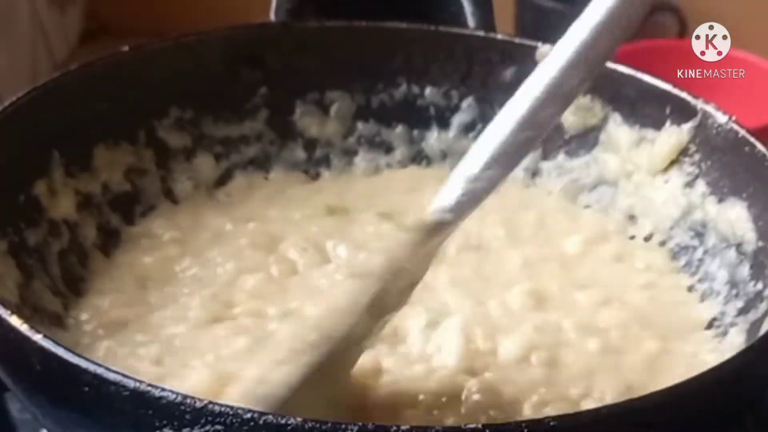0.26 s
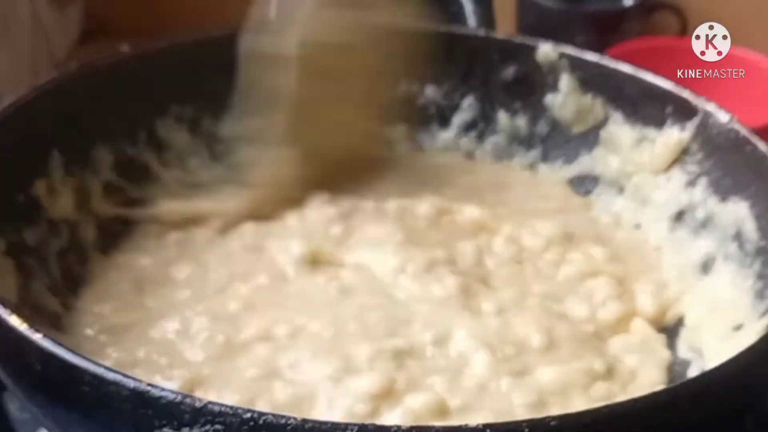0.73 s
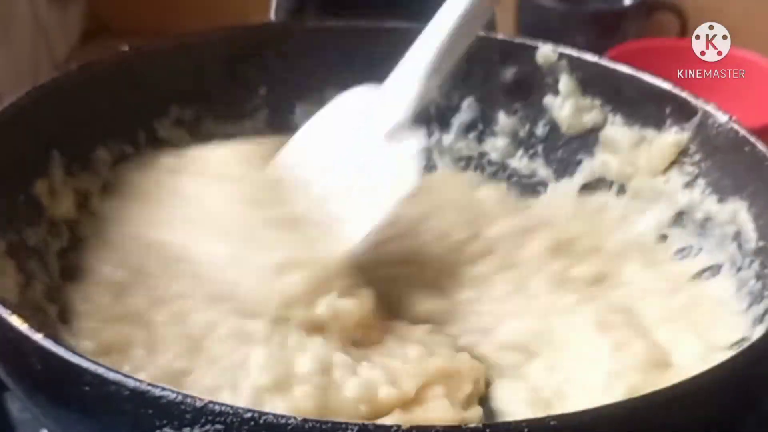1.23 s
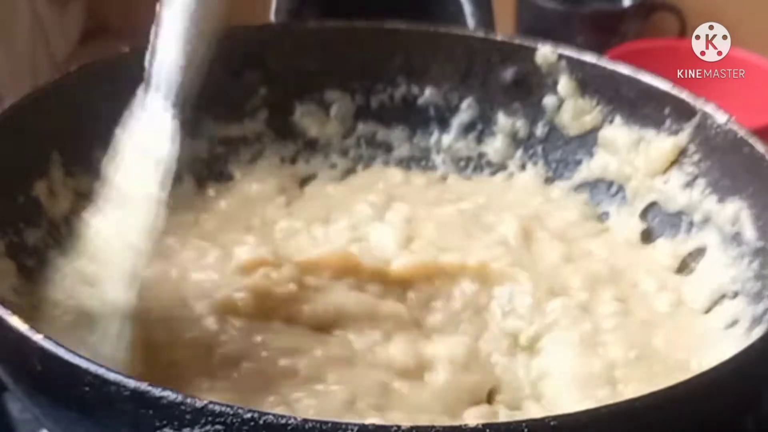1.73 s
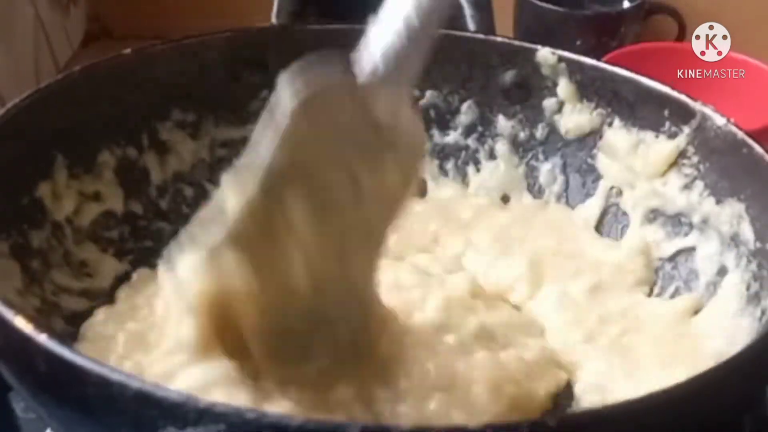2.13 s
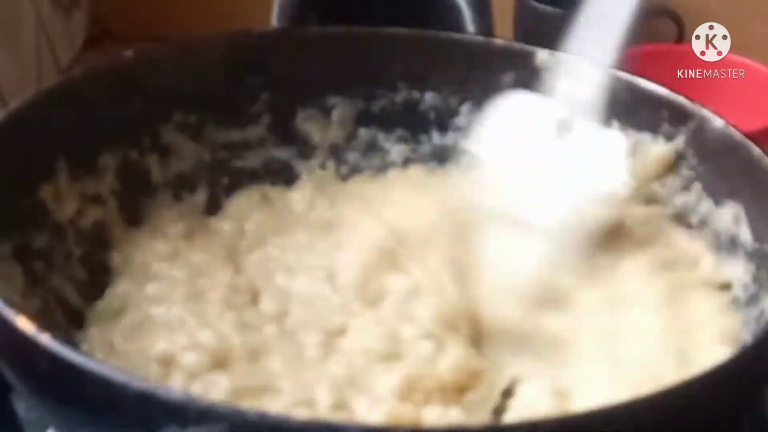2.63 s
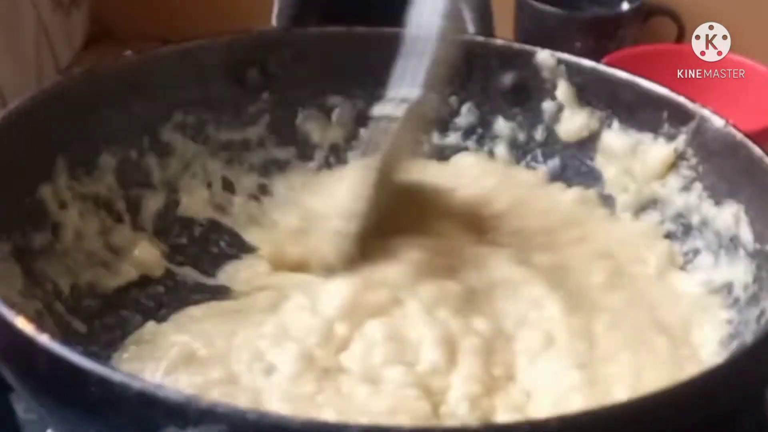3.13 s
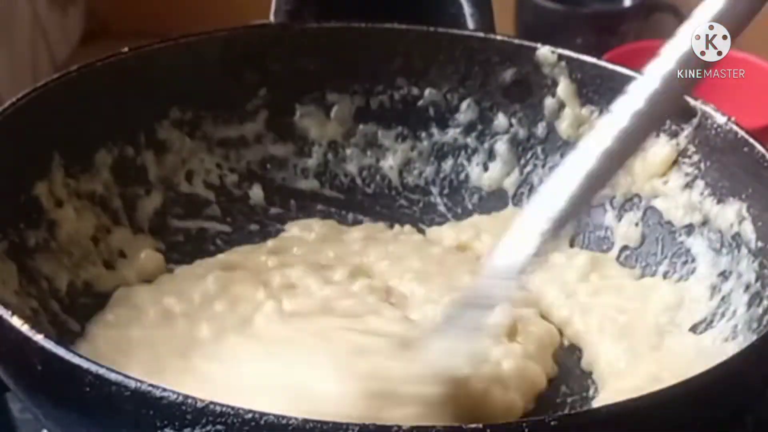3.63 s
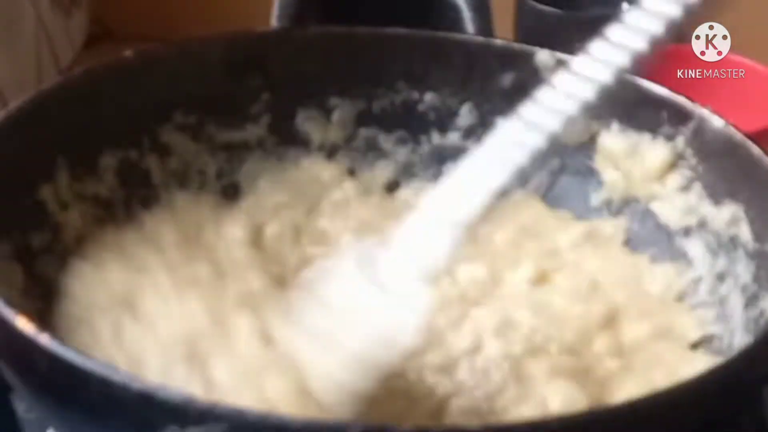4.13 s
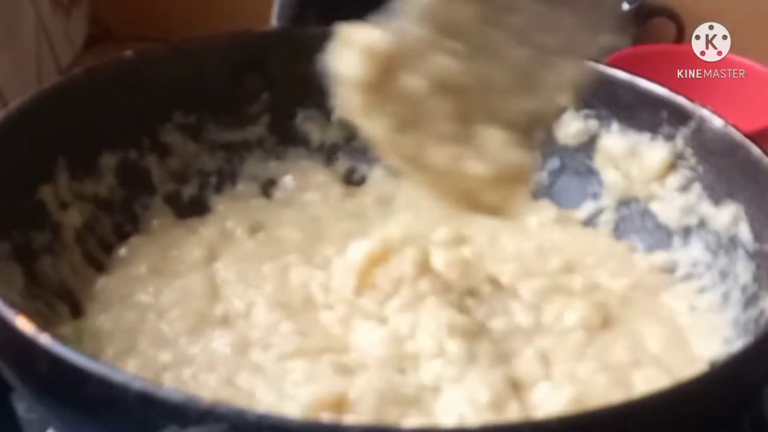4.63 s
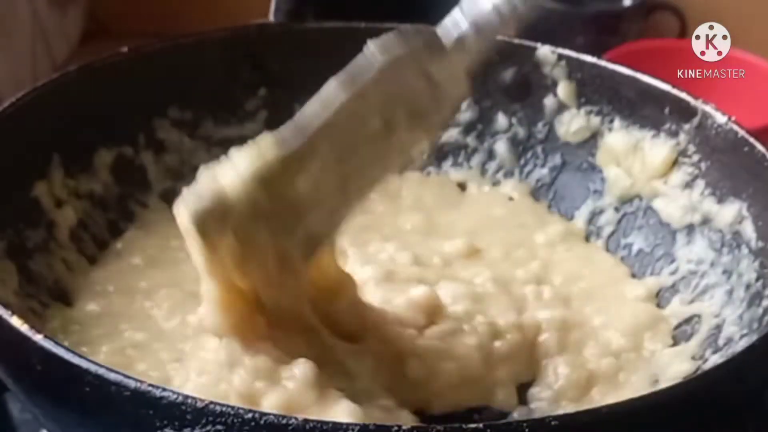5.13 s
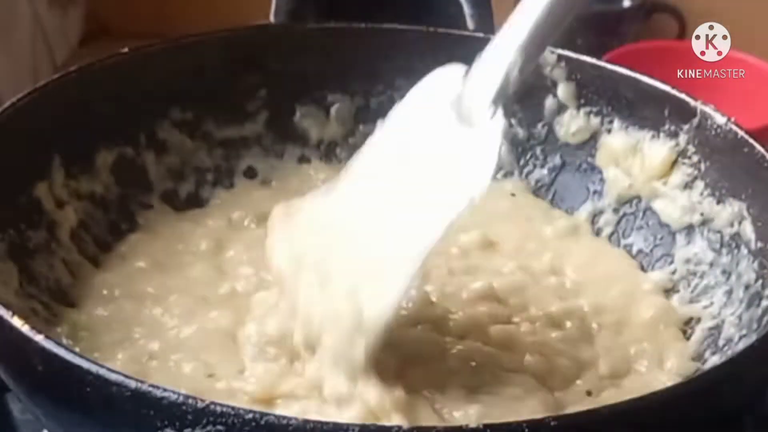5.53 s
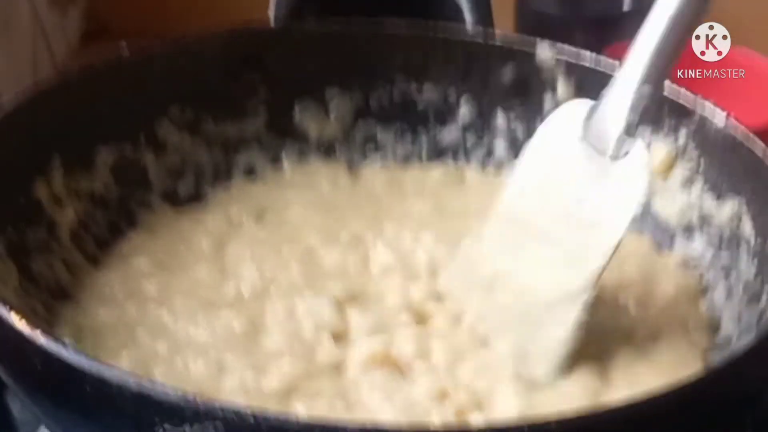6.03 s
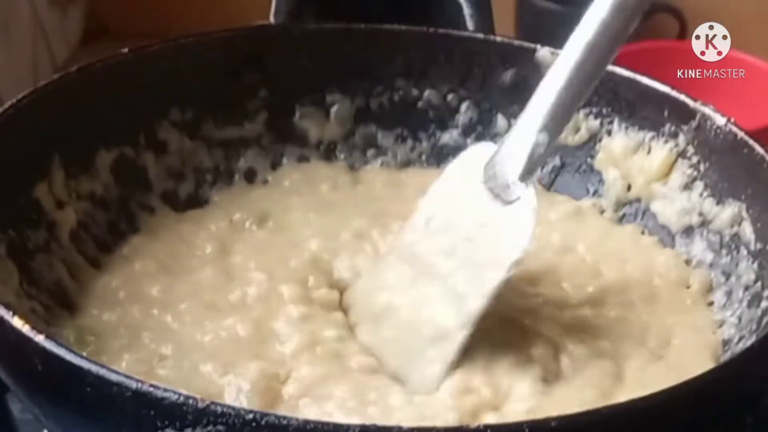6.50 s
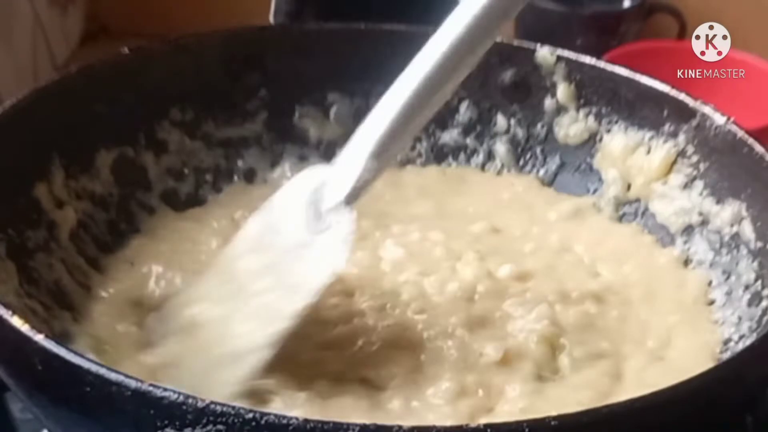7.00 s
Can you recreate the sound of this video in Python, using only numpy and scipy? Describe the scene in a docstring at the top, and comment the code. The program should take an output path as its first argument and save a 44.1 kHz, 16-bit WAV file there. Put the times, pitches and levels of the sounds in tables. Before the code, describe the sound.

Heard up close over a small kitchen's faint hiss and low drone, a spatula works heavy dough around a frying pan. Short gritty scrapes with a slight squeal mix with irregular dull knocks and bright metal ticks. A fold of dough flops over softly early on, and tiny wet pops follow here and there. For the last couple of seconds the blade chops down through the dough, tapping the pan quickly and evenly.

```python
"""A spatula stirs thick dough in a frying pan, close by, over a small kitchen's soft hiss and low drone.
First the blade grinds over the pan floor, rasping and faintly squealing, and knocks the pan, whose
ring the dough damps. Early on a fold of dough flops over; from then on the sticky dough smacks softly
now and then as it parts. From about 5 s the blade chops down through it about six times a second."""
import sys
import numpy as np
from scipy import signal
from scipy.fft import rfft, irfft, next_fast_len
from scipy.io import wavfile
from scipy.ndimage import uniform_filter1d

SR = 44100
rng = np.random.default_rng(int(sys.argv[2]) if len(sys.argv) > 2 else 0)


def to_wav(sig):
    """Store sig (one row per channel, or 1-D mono) as 16-bit WAV at the path in sys.argv[1].

    Samples outside -1..1 are clipped; the rate is SR.
    """
    pcm = np.clip(np.atleast_2d(sig), -1, 1) * 32767
    pcm = np.round(pcm).astype(np.int16)
    wavfile.write(sys.argv[1], SR, pcm.T)  # frames by channels


N = 320166


def amp(db):
    """Turns decibels into a gain to multiply by."""
    return np.exp(np.asarray(db) * (np.log(10) / 20))


def unit(x):
    """Scales a sound to an average (rms) strength of 1."""
    return x / np.sqrt(np.mean(x ** 2) + 1e-20)


def read(points, hz):
    """Reads between a table's rows on a log-frequency axis."""
    f, value = np.transpose(points)
    return np.interp(np.log(hz + 1), np.log(f + 1), value)


def add(mix, s, sound):
    """Mixes a sound in at s seconds."""
    part = mix[:, max(round(s * SR), 0):][:, :sound.shape[1]]
    part += sound[:, :part.shape[1]]


def tint(x, points):
    """Filters a sound by a table of (frequency [Hz], gain [dB])."""
    size = next_fast_len(x.shape[-1] + 512)
    gain = amp(read(points, np.fft.rfftfreq(size, 1 / SR)))
    return irfft(rfft(x, size) * gain, size)[..., :x.shape[-1]]


def noise(gain, size):
    """Stereo noise shaped by gain(hz), with left and right most alike in the bass."""
    # how alike the two sides are: (frequency [Hz], correlation [0 to 1])
    likeness = [(30, 0.24), (120, 0.83), (500, 0.85), (1000, 0.5), (2000, 0.077), (5000, 0.23),
                (12000, 0.09)]
    full = next_fast_len(size)
    hz = np.fft.rfftfreq(full, 1 / SR)
    shared, apart = rfft(rng.standard_normal((2, full)))
    same = read(likeness, hz)
    spectrum = shared * np.sqrt(1 + same) + np.array([[1], [-1]]) * apart * np.sqrt(1 - same)
    return unit(irfft(spectrum * gain(hz), full)[:, :size])


def wash(points, size):
    """Noise shaped by a table of (frequency [Hz], level [dB])."""
    return noise(lambda hz: amp(read(points, hz)), size)


def whistle(peaks, size):
    """Noise gathered around peaks of (pitch [Hz], width [Hz], level [dB])."""
    return noise(lambda hz: sum(amp(db) / (1 + ((hz - f) / width * 2) ** 2)
                                for f, width, db in peaks), size)


def kitchen(hiss_db=-59.5):
    """A soft even hiss and a low drone that slowly swells and sinks."""
    # tone of the hiss: (frequency [Hz], relative level [dB])
    hiss_tone = [(30, -14), (70, -27), (110, 4.5), (250, -1), (500, -2.5), (1000, -4), (2000, -2.5),
                 (3000, 1.5), (5500, -4), (10000, -4), (11200, -6), (13000, -3.5), (14500, 4), (15400, -8),
                 (16000, -24)]
    # notes of the drone: (pitch [Hz], width [Hz], relative level [dB])
    drone_notes = [(109, 11, -16), (165.3, 10, 1), (208.5, 24, -4), (310, 30, -7.5), (445, 39, -8)]
    # loudness of the drone: (time [s], level [dB])
    drone_levels = [(0, -69.5), (1.0, -66), (2.6, -65.5), (3.6, -69), (4.5, -70.5), (5.3, -68), (7.26, -71)]
    drone_db = np.interp(np.arange(N) / SR, *np.transpose(drone_levels))
    return amp(hiss_db) * wash(hiss_tone, N) + amp(drone_db) * whistle(drone_notes, N)


def pressure(t, swell, hold, swell_db=27, sag_db_per_s=29.5, release_db_per_s=370):
    """The hand presses harder until t = 0, eases off while it holds, then lets go."""
    rise_db = swell_db * np.minimum(t, 0) / swell
    return amp(rise_db - sag_db_per_s * np.clip(t, 0, hold) - release_db_per_s * np.maximum(t - hold, 0))


def pan_blow(spot_hz, crack_db, notes_db, crack_fade_s, spot_db, spot_width):
    """One blow gives a crack, a dense ring and the pan's own notes; the spot hit favours spot_hz."""
    # notes of the loaded pan on its stand: (pitch [Hz], relative level [dB], time to fade 60 dB [s])
    pan_notes = [(136.8, -14.5, 0.17), (226.3, -20.5, 0.2), (307.7, -2, 0.098), (443, -7.5, 0.15),
                 (659, -13.5, 0.13), (697.4, -9.5, 0.14), (800.6, -3.5, 0.15), (864.7, -9, 0.15),
                 (984, -5, 0.083), (1090.5, -11, 0.16), (1140, -1.5, 0.095), (1207, 11, 0.0055),
                 (1380, -13, 0.1), (1589, -10, 0.12), (1784, -11.5, 0.2), (1860, -25.5, 0.14),
                 (2020, -10, 0.1), (2210, -22, 0.056), (2706, -12.5, .12), (2885, -8, 0.069),
                 (3000, -15.5, 0.11), (3590, -17, 0.09), (4100, -51, 0.078), (4890, -0.5, 0.019),
                 (4680, -4, 0.042)]
    # first crack of contact: (frequency [Hz], relative level [dB])
    crack_tone = [(300, -29), (800, -23.5), (1500, 10.5), (3000, -2.5), (5000, 6), (6500, -9.5),
                  (10000, -11), (13000, -1.5), (15000, -20), (16000, -8)]
    # dense ring of pan and room: (frequency [Hz], relative level [dB])
    ring_tone = [(40, -39), (90, -16.5), (140, 1), (370, -6), (550, -2.5), (900, 1.5), (1800, -2),
                 (3400, -9.5), (4800, -7), (6000, -11), (10000, -18.5), (13000, -13.5), (15000, -23),
                 (16000, -39)]
    # how long that ring lasts: (frequency [Hz], time to fade 60 dB [s])
    ring_fades = [(150, 0.22), (400, 0.15), (1000, 0.16), (3000, 0.16), (12000, 0.16)]
    size, build_cycles, scatter_db, detune = 10000, 3.67, 2.5, 0.0067
    t = np.arange(size) / SR
    favour = lambda hz: spot_db * np.exp(-(np.log((hz + 1) / spot_hz) / spot_width) ** 2)
    crack = amp(crack_db - 60 * t / crack_fade_s) * wash(crack_tone, size)

    dense = noise(lambda hz: amp(read(ring_tone, hz) + favour(hz)), size)
    hz, when, bands = signal.stft(dense, SR, nperseg=256)
    bass_rise = 1 - np.exp(-(when + 0.00045) * (hz[:, None] + 60) / build_cycles)
    decay = amp(-60 * when / read(ring_fades, hz)[:, None])
    ring = signal.istft(bands * bass_rise * decay, SR, nperseg=256)[1][:, :size]

    note_hz, db, fade_s = np.transpose(pan_notes)[:, :, None]
    scatter, load, phase = rng.standard_normal((len(pan_notes), 3)).T[:, :, None]
    rise = np.where(note_hz < 600, 1 - np.exp(-t * note_hz / build_cycles), 1)  # low notes build slowly
    level = rise * amp(db + favour(note_hz) + scatter_db * scatter - 60 * t / fade_s)
    shifted_hz = note_hz * (1 + detune * load)  # shifting dough detunes the pan
    notes = level * np.sin(2 * np.pi * shifted_hz * t + 2 * phase)
    contact = 1 - np.exp(-t / 0.00026)
    return (crack + ring + amp(notes_db) * notes.sum(0)) * contact


def slips(per_s, spread_db, size):
    """Sticking and slipping makes tiny jolts of uneven strength at random moments."""
    chance, strength, sign = rng.random(size), rng.exponential(1, size), rng.choice([-1, 1], size)
    return (chance < per_s / SR) * sign * amp(spread_db * np.minimum(strength, 3))


def catches(size, fade_s=0.0034):
    """Burnt-on crumbs catch the edge, adding brief sharp surges to the steady friction."""
    jolts = abs(slips(per_s=90, spread_db=3, size=size))
    surges = signal.lfilter([1], [1, -np.exp(-1 / (fade_s * SR))], jolts)
    return 1.5 + 0.42 * surges


def patchy(x, depth_db, width_hz=220, step_hz=40):
    """Each patch of contact favours its own narrow bands of pitch."""
    hz = np.arange(0, SR / 2, step_hz)
    smoothing = signal.butter(2, step_hz / width_hz, output="sos")
    bumps = signal.sosfiltfilt(smoothing, rng.standard_normal(len(hz)))
    return tint(x, np.transpose([hz, depth_db * unit(bumps)]))


def scrapes(rumble_db=-2, grind_db=-2, squeal_db=-3, rasp_db=3, blade_hz=2850):
    """With each push, slips shake the pan, fine grit rasps and friction keeps the blade singing."""
    # pushes over the pan floor: (time of full pressure [s], swell [s], hold [s], relative levels of
    # grind, rumble, squeal and rasp [dB], pan's pitch at that spot [Hz], squeal pitch [Hz])
    pushes = [(0.004, 0.02, 0.0091, -36.5, -36.5, -58, -50, 675, 2730),
              (0.103, 0.047, 0.073, -38.5, -38, -61, -49.5, 715, 2730),
              (0.411, 0.041, .11, -45.5, -45, -72, -58.5, 715, 2680),
              (0.814, 0.095, 0.072, -41.5, -43, -46.5, -48.5, 720, 3670),
              (1.29, 0.08, 0.033, -41.5, -46, -45, -43.5, 836, 2864),
              (1.407, 0.054, .025, -46, -59, -38.5, -48.5, 1290, 2880),
              (1.478, 0.029, 0.029, -39, -44.5, -39, -42.5, 1470, 2840),
              (1.557, .02, 0.048, -65, -64, -59, -59.5, 1370, 2820),
              (1.913, 0.093, 0.1, -34.5, -43.5, -55, -54, 1120, 2600),
              (2.079, 0.075, 0.038, -45, -56, -41.5, -48, 1320, 2870),
              (2.569, 0.054, 0.035, -38, -45, -43, -44, 835, 2880),
              (2.7, 0.022, 0.029, -49, -71, -40.5, -52, 745, 2880),
              (2.769, 0.043, 0.037, -36.5, -48, -41.5, -44, 780, 2850),
              (2.85, .03, 0.021, -64, -66, -67, -65, 800, 2850),
              (3.2, 0.11, 0.041, -40, -48, -49.5, -55.5, 890, 2860),
              (3.262, .04, 0.0067, -43.5, -58, -41, -44.5, 850, 2830),
              (3.547, .08, 0.066, -38.5, -48, -51, -50, 740, 2820),
              (3.654, 0.06, 0.036, -42.5, -55, -37.5, -46, 696, 2860),
              (3.707, 0.073, 0.041, -44, -44.5, -46.5, -48, 740, 2920),
              (4.166, 0.06, 0.038, -38.5, -48.5, -57, -48, 840, 2850),
              (4.3, 0.22, .015, -48.5, -64, -44, -50.5, 930, 2836),
              (4.375, 0.054, 0.033, -42, -49.5, -42, -46, 990, 2870),
              (4.472, 0.047, 0.0065, -52, -64, -49, -50, 1080, 2800)]
    # the blade's notes when it squeals at blade_hz: (pitch [Hz], width [Hz], relative level [dB])
    blade_notes = [(2690, 570, -4), (2877, 63, 3), (4830, 130, -6.5)]
    # low rumble of the shaken pan: (frequency [Hz], gain [dB])
    rumble_tone = [(60, -17), (140, -8), (230, -3), (310, -4), (450, 2), (700, 2.5), (780, -4), (1100, -25)]
    # grinding of the shaken pan: (frequency [Hz], gain [dB])
    grind_tone = [(500, -43), (700, -10), (820, 5), (1200, 1.5), (2200, -0.5), (3500, -1.5), (5000, -35),
                  (8000, -42)]
    # high rasp of grit: (frequency [Hz], relative level [dB])
    rasp_tone = [(1500, -17.5), (3200, -5), (3800, -3), (4400, 0), (4900, 3), (5600, -6), (6500, -5.5),
                 (8000, -5), (10000, -9.5), (11300, -7), (13500, -8), (15000, -13), (16000, -27)]
    out = np.zeros((2, N))
    size, lead = 15000, 5000
    t = (np.arange(size) - lead) / SR
    for s, swell, hold, grind, rumble, squeal, rasp, spot_hz, squeal_hz in pushes:
        # bending shifts the blade's notes
        bent = [(hz * squeal_hz / blade_hz, width, db) for hz, width, db in blade_notes]
        press = pressure(t, swell, hold)
        early = pressure(t + 0.0024, swell, hold)  # the blade sings while it still slides lightly
        late = pressure(t - 0.0091, swell, hold)  # the pan rumbles once dough piles up
        blow = pan_blow(spot_hz, crack_db=11.5, notes_db=-3.5, crack_fade_s=0.018,
                        spot_db=5.5, spot_width=0.074)
        jolts = slips(per_s=600, spread_db=3.5, size=size + blow.shape[1] - 1)
        shaken = signal.fftconvolve(jolts[None], blow, "valid", axes=1)
        grit = amp(unit(uniform_filter1d(rng.standard_normal(size), size=60)))  # flickers by about 1 dB
        rasping = catches(size) * grit * patchy(wash(rasp_tone, size), depth_db=-0.5)
        sound = amp(rumble + rumble_db) * late * unit(tint(shaken, rumble_tone))
        sound += amp(grind + grind_db) * press * unit(tint(shaken, grind_tone))
        sound += amp(rasp + rasp_db) * press * unit(rasping)
        sound += amp(squeal + squeal_db) * early * unit(grit * whistle(bent, size))
        add(out, s + t[0], sound[:, s + t >= 0])
    return out


def knocks(broad_share=0.33, ping_db=-3.5, tick_db=2.5):
    """The blade lands: bare metal ticks brightly and rings it, a cushion of dough leaves a dull knock."""
    # blade meets pan: (time [s], gain [dB], extra thump [dB], extra blade ring [dB],
    # hardness of the contact [dB], pan's pitch at that spot [Hz])
    landings = [(0.3035, -46, -4, 12, 5.5, 770), (0.383, -44, 7, 0.5, -12, 804),
                (0.546, -53, 7, -17, -14, 1400), (0.7435, -48, 0, 5.5, -1.5, 714),
                (1.1238, -34, -4, -3.5, -9.5, 660), (1.1721, -35.5, -1.5, -6, -12, 695),
                (1.23, -48.5, -4, 22.5, 6.5, 740), (1.294, -34, -29, -3, -19, 810),
                (1.3612, -37, 2, -0.5, -0.5, 1090), (1.477, -30, -16, 2.5, -2.5, 1470),
                (1.5546, -41.5, -5, -20, -11, 1490), (1.8202, -42, 7.5, 1, -3, 660),
                (1.829, -39.5, 5.5, -2, -12, 670), (1.9939, -47.5, 12, -15, -15, 1190),
                (2.0751, -37.5, 1.5, 4, -14, 1410), (2.382, -35.5, 0, 7.5, -0.5, 755),
                (2.5117, -50, -17, 19.5, 6, 820), (2.575, -38.5, -3.5, -19, -13, 800),
                (2.6517, -36.5, -4, -3, -2, 694), (2.7751, -45, -0.5, 18, -11, 800),
                (2.8569, -51, -1, -5, -12, 1320), (2.873, -54.5, 5, 0, -12, 1100),
                (3.099, -42, 9, 5.5, 0, 765), (3.107, -38, 3, -24, -8, 780),
                (3.2172, -41.5, -24, 3, -0.5, 880), (3.4785, -44, -6, -4, 0, 805),
                (3.485, -41, 3, -12, -19, 810), (3.6153, -38, -3, 9, -1, 704), (4.1, -53, 3.5, 19, 4, 760),
                (4.1626, -36, -5, 3.5, 0, 850), (4.872, -38.5, -1.5, 10, 2.5, 1370),
                (5.1011, -54, 11, 11, 5, 940), (5.108, -44.5, 5, 15, 5.5, 930),
                (5.3387, -43.5, 3, 12, 2.5, 880), (5.5144, -27, -3.5, -11, -5.5, 1000),
                (5.5231, -32, 2.5, 12, 2, 980), (5.675, -38, 3, 9.5, 2, 860),
                (5.8218, -29.5, 2.5, 6.5, 3, 870), (5.9662, -28.5, -1.5, 3, 2, 884),
                (6.101, -27.5, -0.5, 4.5, 2.5, 1030), (6.2447, -33, -3, 9, 4.5, 1080),
                (6.4015, -30.5, 1, -1.5, 5, 1000), (6.566, -34.5, 2, 6, 5.5, 1080),
                (6.7255, -39, 3, 5, 8.5, 870), (6.8818, -42.5, 7, 6, -3, 990),
                (7.0395, -34, 1.5, -4, -4, 1700), (7.2148, -32, -2.5, -1, -1, 1680)]
    out = np.zeros((2, N))
    for s, db, thump, blade, hard, spot_hz in landings:
        ping, tick = hard + ping_db, hard + tick_db
        lows = [(60, 0), (150, thump), (450, thump), (800, 0), (1700, 0)]
        highs = [(2350, broad_share * blade), (2850, blade), (3600, broad_share * (blade + ping)),
                 (4850, ping), (7000, hard), (11000, tick)]
        blow = pan_blow(spot_hz, crack_db=12, notes_db=-2, crack_fade_s=0.01,
                        spot_db=6.5, spot_width=0.11)
        add(out, s, amp(db) * tint(blow, lows + highs))
    return out


def plop(at_s=0.405, length_s=0.062, level_db=-50, pitch_hz=237, width_hz=70):
    """A fold of dough flops over and presses out trapped air with a soft low gulp."""
    out, size = np.zeros((2, N)), int(length_s * SR)
    gulp = whistle([(pitch_hz, width_hz, 0)], size) * signal.windows.tukey(size)
    add(out, at_s, amp(level_db) * unit(gulp))
    return out


def smacks(pop_fade_s=0.018, pop_width_hz=1600):
    """Sticky dough parts in short clusters of tiny wet pops."""
    # dough pulling apart: (time [s], length [s], level [dB], pitch [Hz])
    partings = [(0.623, 0.082, -63, 1270), (2.29, 0.093, -69, 1170), (3.303, 0.14, -68, 1280),
                (4.582, 0.057, -71, 1980), (4.802, 0.09, -63, 1800), (4.946, 0.075, -64, 1680),
                (5.17, 0.076, -63, 1330), (5.258, 0.042, -69.5, 1900), (6.195, 0.045, -66, 1290),
                (6.328, 0.14, -63, 1060)]
    out, t = np.zeros((2, N)), np.arange(2000) / SR
    for s, length, db, hz in partings:
        size = int(length * SR)
        pop = whistle([(hz, pop_width_hz, 0)], len(t)) * amp(-60 * t / pop_fade_s)
        cluster = slips(per_s=440, spread_db=2, size=size) * signal.windows.tukey(size)
        add(out, s, amp(db) * unit(signal.fftconvolve(cluster[None], pop, axes=1)))
    return out


def reflected(x, lowest_hz=2000):
    """Small surfaces close by throw back only the treble, as very quick echoes."""
    # echoes off pan wall, hob and splashback: (left delay [s], right delay [s], gain [dB])
    echoes = [(.0011, 0.0015, -21), (.0027, .00265, -19.5), (.0043, 0.0042, -12.5), (.0069, 0.0043, -15.5),
              (.0098, 0.0098, -17)]
    treble = signal.sosfilt(signal.butter(2, lowest_hz, "high", fs=SR, output="sos"), x)
    out = x.copy()
    for left, right, db in echoes:
        add(out[:1], left, amp(db) * treble[:1])
        add(out[1:], right, amp(db) * treble[1:])
    return out


def scene():
    """Spatula, pan and dough with their echoes, over the kitchen background."""
    return reflected(knocks() + scrapes() + plop() + smacks()) + kitchen()


def record(dry, lag_samples=1.73, low_cut_hz=55, high_cut_hz=15700):
    """Two microphone openings, the left a little nearer; the deepest bass and highest treble are cut."""
    # the microphone's uneven treble: (frequency [Hz], gain [dB])
    microphone = [(7000, -0.5), (7800, -0.5), (8700, -1), (9500, -1.5), (10100, -4.5), (11200, 2.5),
                  (12000, -5.5), (13200, 1.5), (14000, -1.5), (14800, 7), (15400, 9)]
    hz = np.fft.rfftfreq(N, 1 / SR)
    lean_db = read([(200, 0.8), (700, -2.5), (2000, 0.082), (12000, 0.52)], hz)  # left over right
    right_delay = np.exp(-2j * np.pi * hz * lag_samples / SR)
    sides = np.array([amp(lean_db / 2), amp(-lean_db / 2) * right_delay])
    heard = irfft(rfft(dry) * sides * amp(read(microphone, hz)), N)
    heard = signal.sosfilt(signal.butter(2, low_cut_hz, "high", fs=SR, output="sos"), heard)
    high_cut = signal.firwin(401, high_cut_hz, window=("kaiser", 9), fs=SR)
    return signal.oaconvolve(heard, high_cut[None], "same")


dry = scene()
out = record(dry)
to_wav(out)
```